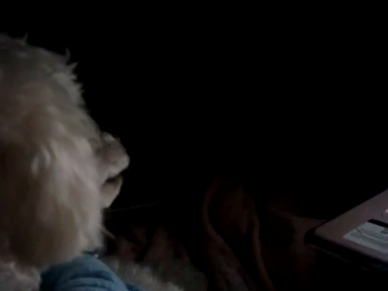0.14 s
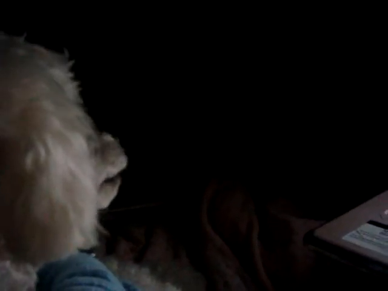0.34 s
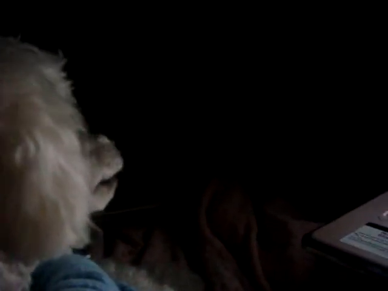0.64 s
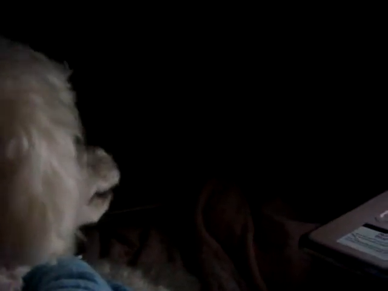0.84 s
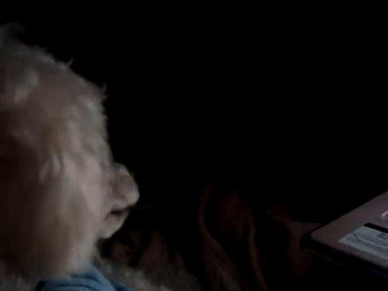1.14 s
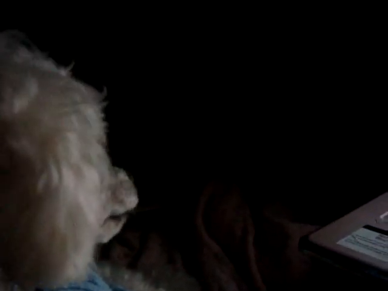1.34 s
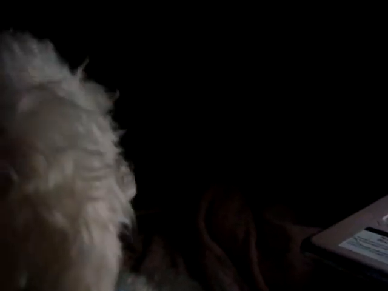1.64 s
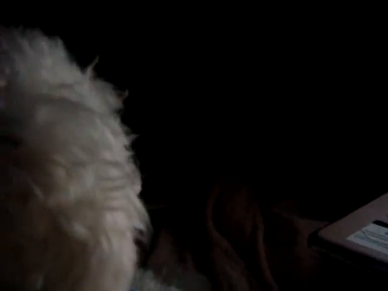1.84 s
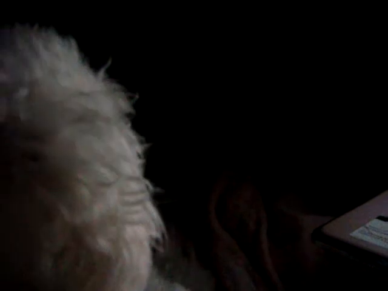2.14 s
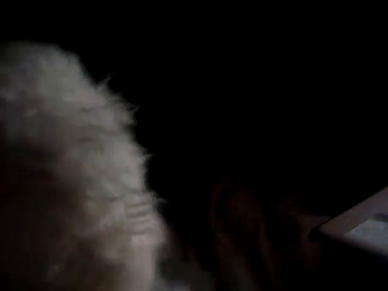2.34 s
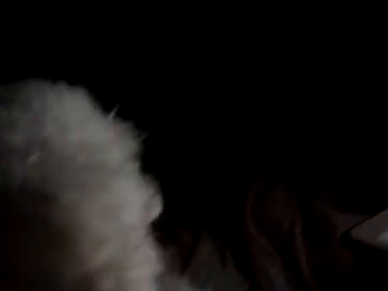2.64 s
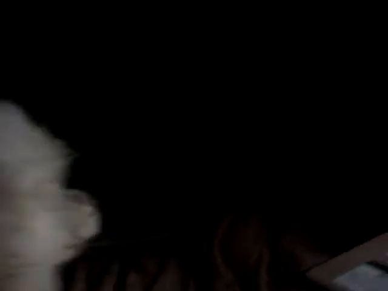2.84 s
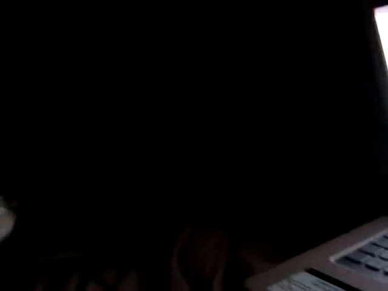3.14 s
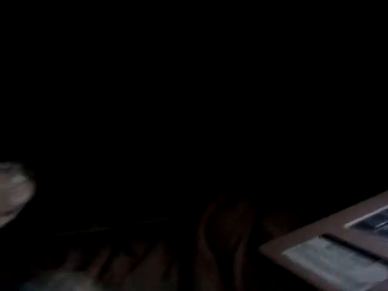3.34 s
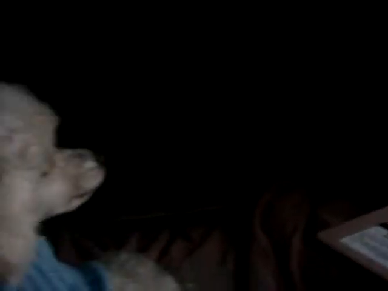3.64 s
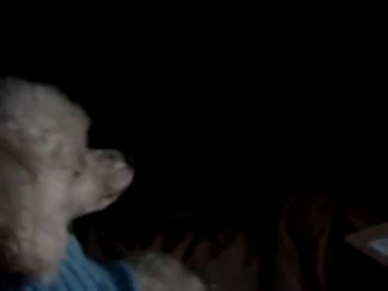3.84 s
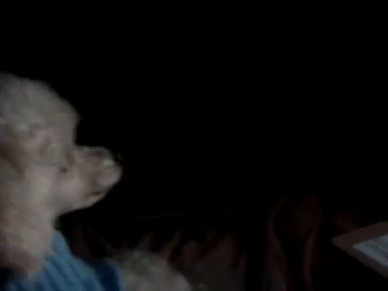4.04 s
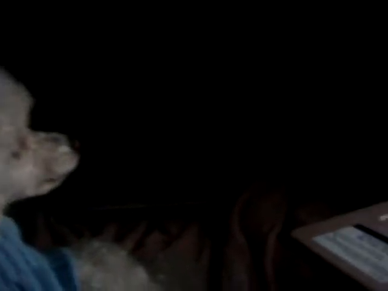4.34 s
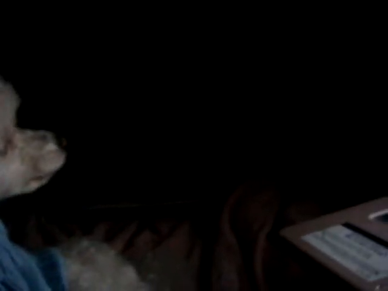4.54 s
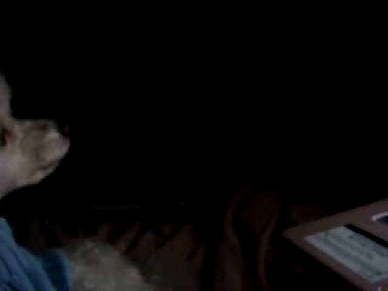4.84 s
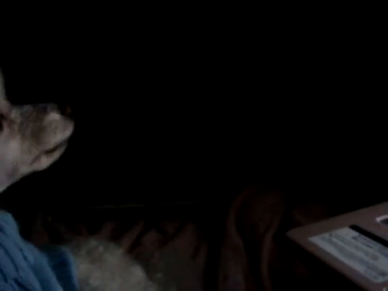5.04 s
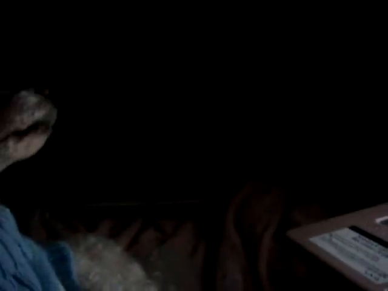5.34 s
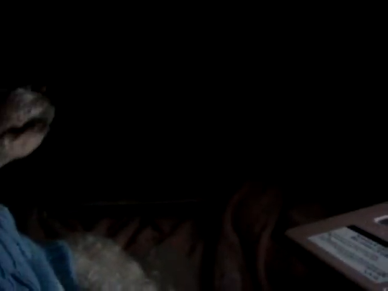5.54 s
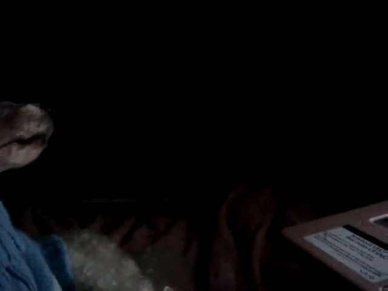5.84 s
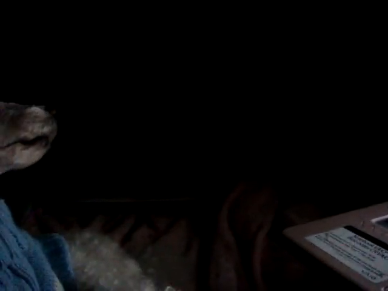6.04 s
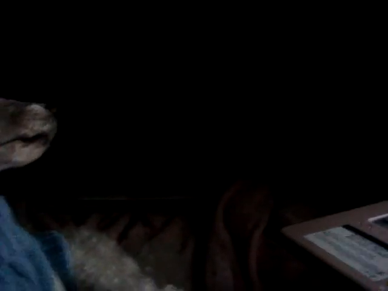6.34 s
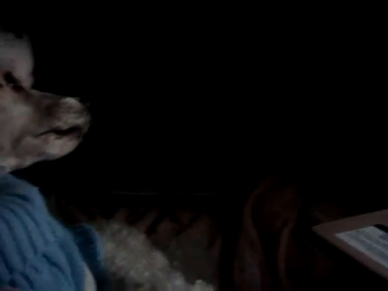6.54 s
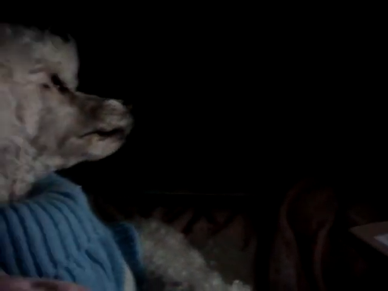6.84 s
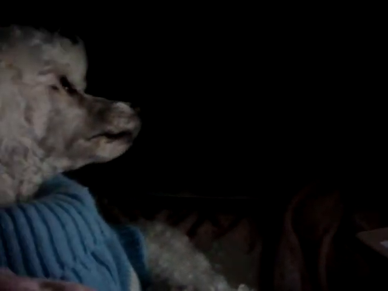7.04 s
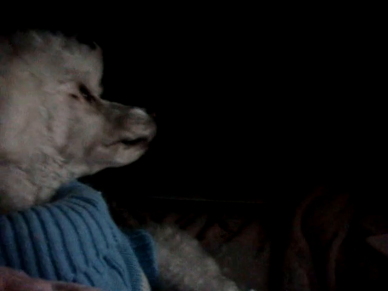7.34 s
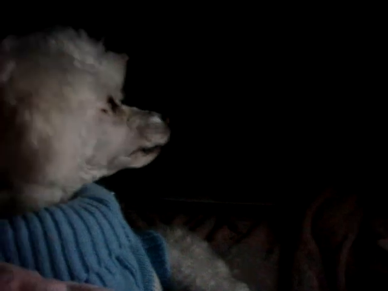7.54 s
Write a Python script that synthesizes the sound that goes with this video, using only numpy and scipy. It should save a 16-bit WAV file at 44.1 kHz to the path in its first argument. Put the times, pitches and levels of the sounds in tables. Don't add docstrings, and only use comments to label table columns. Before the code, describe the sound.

Quiet room, steady faint hiss from a cheap microphone, with dull lows and little top end. At 0.2-0.5 s a barely audible low growl flutters. Around 1.1 s comes a tiny thin peep with a soft grunt; at 1.4 s a short yip with a dry tick, then a faint falling sigh to 1.9. From 2.1 to 2.35 a close whine leaps up and drops; from 2.5 to 3.15 a yelp soars and slides continuously down through a wail into a low sob. A rough, quiet grumble runs 3.35-3.7, with a small dry tick at 3.45. Faint grunts follow near 4. A soft yip at 4.35 leads to sharp high yips at 4.6 (doubled), 4.9 and 5.15, a faint one at 5.6, then loud ones at 5.8 and 6.15, ringing off hard walls. Soft low grunts at 6.4-7.1, a last loud yip at 7.3, then a faint closing moan.

```python
import sys
import numpy as np
from scipy import signal
from scipy.fft import rfft, irfft, next_fast_len
from scipy.io import wavfile
from scipy.ndimage import uniform_filter1d, map_coordinates

SR = 44100
rng = np.random.default_rng(int(sys.argv[2]) if len(sys.argv) > 2 else 0)


def digitize_waveform(pressure):
    field = np.atleast_2d(pressure).T
    bounded = np.clip(field, -1, 1)
    quanta = np.round(bounded * 32767).astype(np.int16)
    wavfile.write(sys.argv[1], SR, quanta)


def linear_from_db(decibels):
    return 10 ** (np.asarray(decibels, float) / 20)


N = 339129

# break_s, length_s, first_hz, last_hz, level_db
YIP_CLIMBS = [
    (1.434, .021, 410, 510, -24),
    (4.595, 0.025, 707, 908, -13.5),
    (4.615, 0.02, 819, 960, -16.5),
    (4.879, .031, 602, 843.8, -14.5),
    (5.146, 0.048, 669, 891, -17.5),
    (5.812, 0.035, 668.5, 867, -12),
    (6.153, .047, 643.4, 883, -11),
    (7.323, 0.024, 782, 826.4, -10.5),
    (4.349, 0.05, 752, 1410, -29.5),
    (5.61, .038, 413.3, 560, -25.5),
]
# length_s, first_hz, top_hz, last_hz, level_db
YIP_FALLS = [(0.057, 680, 810, 870, -11), (.006, 740, 1000, 845, -27), (0.06, 1630, 1580, 890, -22),
             (0.039, 1030, 1065, 910, -17.5), (.06, 1110, 1120, 790, -23.5), (.075, 1100, 1280, 1240, -20),
             (.105, 1265, 1275, 880, -19.5), (0.087, 1260, 1350, 830, -15.5), (.075, 1450, 1470, 1100, -22),
             (0.065, 570, 745, 460, -26)]
# brightness_db_per_octave, room_db, mouth_hz, mouth_db
CLIMB_MOUTHS = [(-0.5, -17, 762.5, 25), (4, -3.5, 2330, 12), (8.5, -2, 2500, 16.5), (2.5, -10, 2110, 16.5),
                (1.5, -10.5, 1420, 7.5), (5, -9, 2200, 8.5), (7, -10, 2720, 9), (0.5, -8.5, 2450, 17.5),
                (-1, -1, 5400, 7.5), (-3, 0, 5500, 8.5)]
# brightness_db_per_octave, room_db, mouth_hz, mouth_db
FALL_MOUTHS = [(6, -9, 2230, 18.4), (1.5, -12.5, 2700, 9), (1, 0, 5320, 12), (1, -1.5, 2100, 16),
               (0, -7.5, 2200, 4.9), (4, 0.5, 2520, 14), (6, -1.5, 2330, 13.495), (5, -2.5, 2520, 18.1),
               (-1.5, -9, 5700, 14), (-5.5, -7.5, 5300, 13)]
# share_of_length_to_come, share_of_climb, level_db
CHEST_SHAPE = [(1, 0.0083, -24), (.75, 0.093, -10.5), (.25, .65, -.1), (0.016, 0.98, -13)]
# share_of_length, share_of_rise, share_of_sag, level_db
HEAD_SHAPE = [(0, 0.18, 0.0082, -12), (0.088, 0.00814, 0.012, -0.76), (.38, .99, 0.0093, -4.5),
              (.62, .99, .3, -13.5), (1, 1, 1, -15)]
EFFORT_BRIGHTENS = 0.31
YIP_DOUBLING = 0.21

# room_db, mouth_hz, mouth_db
WHIMPER_MOUTHS = [
    (-10.5, 3456, 10),
    (-9, 460, -3.5),
    (-9, 2110, 6),
    (-8.5, 1911, 6),
    (-9, 2760, -7.5),
    (-8.5, 1400, 12.5),
]
# time_s, pitch_hz, level_db, brightness_db_per_octave
PEEP = [(1.088, 1086, -39.5, 0), (1.11, 1296, -40.5, -3), (1.126, 1373, -29.5, -12.5),
        (1.142, 1312, -31, -10.5), (1.154, 1272, -41, 3), (1.196, 1294, -33.5, 3), (1.215, 1220, -40.5, 4),
        (1.228, 1105, -35.5, -10)]
SIGH = [(1.545, 1116, -58, -15), (1.583, 782, -34, -12), (1.599, 703, -56, 7), (1.63, 450, -35.5, -6.5),
        (1.65, 375.5, -33, 1.5), (1.694, 335.7, -38.5, -2), (1.759, 289, -33, -2), (1.868, 260.2, -33, -11),
        (1.9, 240, -53.5, 6.5)]
WHINE = [(2.091, 677, -38.5, 2.5), (2.112, 842, -23, -1.5), (2.13, 1151, -25, 2),
         (2.151, 1325, -39.5, -0.5), (2.176, 1174, -29, 3.5), (2.202, 921, -25.5, 4),
         (2.231, 829, -24, -12.5), (2.303, 808, -21.5, -5.5), (2.356, 870, -36, 5.5)]
YELP = [(2.52, 742, -41.5, 5), (2.536, 823, -25.5, -3.5), (2.549, 920, -19.5, -2.5),
        (2.56, 1204, -27, -1.5), (2.577, 1445, -30.5, 1), (2.6, 1470, -25, 3), (2.619, 1403, -33.5, 2),
        (2.643, 1226, -39, 1.5)]
WAIL = [(2.642, 1245, -36.5, 5), (2.672, 1088, -24.5, 0), (2.71, 1001, -25, 4.5), (2.755, 873, -26, 4.5),
        (2.785, 807.6, -18, -5), (2.83, 776, -23, -4), (2.87, 724, -31, 0), (2.905, 660, -28.5, 2.5)]
SOB = [(2.905, 660.6, -25.5, -0.5), (2.936, 635, -27, 3.5), (2.954, 559.7, -21.5, 3),
       (2.97, 523, -24.5, -3), (3.022, 459.7, -23.5, 1), (3.099, 396.2, -26.5, -7.5),
       (3.12, 409, -23, -3.5), (3.165, 386, -42.5, -20)]
# time_s, pitch_hz, level_db, period_doubling (0-1)
GRUMBLE = [(3.345, 280, -37, 0.2), (3.36, 306, -36, 0.5), (3.402, 318.4, -31.5, 0), (3.438, 310, -29.5, 1),
           (3.531, 340.2, -36.5, 0), (3.566, 312.8, -30.5, .9), (3.602, 326, -32, 0.8),
           (3.66, 330.8, -34.5, 1), (3.73, 339.6, -48.5, 0.1)]

# start_s, length_s, first_hz, top_hz, level_db
ARCHES = [(6.646, .11, 298, 354, -34.5), (6.885, 0.1, 408.3, 587, -32.5), (7.127, 0.054, 400, 394, -45),
          (1.473, 0.025, 960, 990, -25), (1.073, 0.035, 460.5, 611, -34), (3.909, 0.056, 313.5, 363, -41.5),
          (3.975, 0.04, 322.2, 320, -50), (4.11, 0.083, 312.3, 415.7, -36),
          (5.368, 0.079, 386, 397.5, -44.5), (5.978, 0.091, 495.5, 497, -45.5),
          (6.41, .12, 296.7, 309.4, -45.5), (7.497, 0.24, 481, 514.6, -43)]
# brightness_db_per_octave, period_doubling (0-1), room_db, mouth_hz, mouth_db
ARCH_MOUTHS = [(-9, 0.4, -5.5, 4550, 16), (-9, 0.31, -5.5, 4550, 14.5), (-9.5, 0.4, -7, 710, 21.5),
               (7.5, 1, -8, 1700, 32.5), (4.5, .55, -8, 1680, 12.5), (-7, .12, -11.5, 1900, 5),
               (-6.5, .05, -3, 998, 8), (0, 0.6, -5, 1440, 4.5), (-5, .45, -9.5, 802, -2),
               (6, 0, -6, 1003, 12), (-5, 0.3, -4.5, 901, -2), (3, 0.14, -2, 997, 3)]
# share_of_length, share_of_climb, level_db
ARCH_SHAPE = [(0, 0.029, -23.5), (.15, .25, 0.5), (.45, .8, -0.7), (.7, .99, 1), (0.998, .8, -17.5)]

# frequency_hz, level_db
OPEN_THROAT = [(150, -74), (400, -36), (650, -6.5), (807, -19), (1000, 4), (1200, -12), (1500, 5.5),
               (1810, -7.5), (2520, -8.5), (2900, -14.5), (3230, -21), (3900, -7), (4810, -10), (6250, -18),
               (6800, -33), (10500, -44.5)]
# frequency_hz, level_db
CLOSED_THROAT = [(150, -86.5), (300, -21), (500, -18.5), (650, 2.5), (807, 10), (1000, 5.5), (1200, -14),
                 (1500, -3), (1900, -4), (2520, -14.5), (3230, -20.5), (3900, -11), (4810, -20.5),
                 (6250, -20), (6800, -39), (10500, -43)]
# frequency_hz, level_db
SPEAKER = [(2950, 1), (3270, -3), (3600, -2), (4300, 0), (4800, 3), (5300, -1), (6300, -5), (6900, -6.5)]
MOUTH_WIDTH = 0.17
TOP_HZ = 10330
OPEN_SMEAR, CLOSED_SMEAR, GRUNT_SMEAR = 0.13, 0.09, 0.13
STRAIN, SMEAR_RISE = 1.45, 1.45

# time_s, level_db
GROWL_LEVEL = [(0.15, -56), (0.162, -65), (0.222, -44), (0.292, -44), (0.378, -42.5), (0.55, -64)]
# time_s, pulses_per_s
GROWL_RATE = [(.2, 95), (.26, 104), (.34, 85.87), (.4, 82), (.5, 116)]
# frequency_hz, level_db
GROWL_COLOUR = [(400, -26.5), (620, -5), (820, 8), (1100, -20.5), (1500, -11.5), (2100, -12), (3000, -34)]

# time_s, peak_db
TICKS = [
    (1.437, -11),
    (3.453, -15),
]
# frequency_hz, level_db
TICK_COLOUR = [(200, -25), (500, -3), (2000, -8), (4200, 0), (6000, -10), (9000, -14)]

# frequency_hz, t60_s
ROOM_DECAY = [(400, 0.499), (1000, 1), (2500, 0.84), (5000, 0.80215), (8000, 0.78)]
# delay_s, level_db
WALLS = [(.013, -12), (.022, -5), (.043, -10)]

# frequency_hz, level_db_per_hz
HISS_COLOUR = [(15, -37.5), (25, -19.5), (119, -11.5), (274, -5.5), (399, -6.5), (431, -6), (568, -8),
               (829, -5), (1270, -9.5), (1440, -5), (2450, -18.5), (3000, -17.5), (9550, -19.5),
               (10300, -23), (13400, -64), (22000, -120)]
HISS_DB = -50


def puppy():
    soft = list(arches())
    calls = [(*call, OPEN_THROAT, OPEN_SMEAR) for call in [*yips(), *soft[:4]]]
    calls += [(*call, CLOSED_THROAT, CLOSED_SMEAR) for call in whimpers()]
    calls += [(*call, CLOSED_THROAT, GRUNT_SMEAR) for call in [grumble(), *soft[4:]]]
    direct, sent = np.zeros(N), np.zeros(N)
    for (room_db, mouth_hz, mouth_db), rows, throat, smear in calls:
        start, call = voice(rows, throat, smear * STRAIN, mouth_hz, mouth_db)
        call = call[:N - start]
        direct[start:start + len(call)] += call
        sent[start:start + len(call)] += call * linear_from_db(room_db)
    return coloured(direct, SPEAKER), coloured(sent, SPEAKER)


def yips():
    for climb, fall, climb_mouth, fall_mouth in zip(YIP_CLIMBS, YIP_FALLS, CLIMB_MOUTHS, FALL_MOUTHS):
        break_s, climb_s, low_hz, high_hz, chest_db = climb
        fall_s, first_hz, top_hz, last_hz, head_db = fall
        chest = [(break_s - share * climb_s, low_hz + rise * (high_hz - low_hz), chest_db, db)
                 for share, rise, db in CHEST_SHAPE]
        head = [(break_s + share * fall_s,
                 first_hz + rise * (top_hz - first_hz) + sag * (last_hz - top_hz), head_db, db)
                for share, rise, sag, db in HEAD_SHAPE]
        for half, (tilt_db, *mouth) in [(chest, climb_mouth), (head, fall_mouth)]:
            yield mouth, [(s, hz, level_db + db, tilt_db + EFFORT_BRIGHTENS * db, YIP_DOUBLING)
                          for s, hz, level_db, db in half]


def whimpers():
    return zip(WHIMPER_MOUTHS, [PEEP, SIGH, WHINE, YELP, WAIL, SOB])


def grumble():
    mouth = (-6, 1255, 9.6)  # room_db, mouth_hz, mouth_db
    tilt_db = -3.5
    return mouth, [(s, hz, db, tilt_db, doubling) for s, hz, db, doubling in GRUMBLE]


def arches():
    for (start_s, length_s, first_hz, top_hz, level_db), settings in zip(ARCHES, ARCH_MOUTHS):
        tilt_db, doubling, *mouth = settings
        yield mouth, [(start_s + share * length_s, first_hz + rise * (top_hz - first_hz),
                       level_db + db, tilt_db, doubling) for share, rise, db in ARCH_SHAPE]


def voice(rows, throat, hoarse, mouth_hz, mouth_db):
    s, *columns = np.array(sorted(rows)).T
    start = round(s[0] * SR)
    t = np.arange(start, round(s[-1] * SR)) / SR
    curves = [uniform_filter1d(np.interp(t, s, column), size=SR // 250) for column in columns]
    hz, level_db, tilt_db, *doubling = curves
    hz = hz * (1 + 0.0066 * wobble(120.02, len(t)))
    phase = 2 * np.pi * np.cumsum(hz) / SR

    order = np.arange(1, 41)[:, None] / (2 if doubling else 1)
    order = order[order[:, 0] * hz.min() < TOP_HZ]
    line_hz = order * hz
    octaves = np.log2(line_hz / 1500)
    mouth = mouth_db * np.exp(-0.5 * (np.log2(line_hz / mouth_hz) / MOUTH_WIDTH) ** 2)
    gain = linear_from_db(along(throat, line_hz) + mouth + tilt_db * octaves) * (line_hz < TOP_HZ)
    smear = np.clip(np.abs(hoarse) * (line_hz / 1500) ** SMEAR_RISE, 0, 0.95)
    if doubling:
        gain[::2] *= np.clip(doubling[0], 0, 1)
        loose = np.clip((-31 - level_db) / 22, 0, 0.6)
        smear = np.clip(smear + loose, 0, 0.95)

    drift = linear_from_db(3 * haze(gain.shape, 35).real)
    lines = drift * np.sqrt(1 - smear ** 2) + smear * haze(gain.shape, 450)
    spin = np.exp(1j * (order * phase + 0.4 * order ** 2))
    tone = (gain * lines * spin).imag.sum(0)
    tone /= np.sqrt((gain ** 2).sum(0) / 2)
    edge = np.clip(np.minimum(t - t[0], t[-1] - t) / 0.0015, 0, 1)
    return start, linear_from_db(level_db) * edge * tone


def growl():
    t = np.arange(N) / SR
    s, db = np.transpose(GROWL_LEVEL)
    rate = np.interp(t, *np.transpose(GROWL_RATE)) * (1 + 0.04 * wobble(50, N))
    pulses = np.diff(np.floor(np.cumsum(rate) / SR), prepend=0)
    pulses = pulses * linear_from_db(2.5 * wobble(60, N))
    source = unit(pulses) + 0.45 * rng.standard_normal(N)
    return linear_from_db(np.interp(t, s, db, -120, -120)) * unit(coloured(source, GROWL_COLOUR))


def ticks():
    out = np.zeros(N)
    t = np.arange(SR // 20) / SR
    for s, peak_db in TICKS:
        crack = linear_from_db(peak_db - 60 * t / 0.01) * rng.standard_normal(len(t))
        out[round(s * SR):][:len(t)] += crack
    return coloured(out, TICK_COLOUR)


def room(x):
    hz, t, z = signal.stft(rng.standard_normal(SR), SR, nperseg=256)
    decay = linear_from_db(-60 * t / along(ROOM_DECAY, hz)[:, None])
    tail = signal.istft(z * decay, SR, nperseg=256)[1]
    fade_in = np.clip(np.arange(len(tail)) / SR / 0.0037, 0, 1)
    tail *= fade_in / np.linalg.norm(tail)
    for s, db in WALLS:
        tail[round(s * SR)] += linear_from_db(db)
    return signal.fftconvolve(x, tail)[:N]


def hiss():
    noise = unit(coloured(rng.standard_normal(N), HISS_COLOUR))
    return linear_from_db(HISS_DB + 0.53 * wobble(7.4, N)) * noise


def unit(x):
    return x / np.sqrt(np.mean(np.abs(x) ** 2) + 1e-20)


def along(points, hz):
    f, v = np.transpose(points)
    return np.interp(np.log(hz + 1), np.log(f + 1), v)


def coloured(x, points):
    size = next_fast_len(len(x) + 8192)
    gain = linear_from_db(along(points, np.fft.rfftfreq(size, 1 / SR)))
    return irfft(rfft(x, size) * gain, size)[:len(x)]


def wobble(rate, size):
    knots = rng.standard_normal(int(size * rate / SR) + 4)
    return map_coordinates(knots, [np.arange(size) * rate / SR])


def haze(shape, width_hz):
    z = rng.standard_normal((2, *shape))
    for _ in range(2):
        z = uniform_filter1d(z, size=round(SR / width_hz))
    return unit(z[0] + 1j * z[1])


def scene():
    direct, sent = puppy()
    return (direct + room(sent) + growl() + ticks() + hiss())[None]


def top_cut(x):
    return signal.sosfilt(signal.butter(12, 10810, fs=SR, output="sos"), x)


def record(dry):
    mix = coloured(dry[0], [(TOP_HZ - 150, 0), (TOP_HZ, -80)])[None]
    return top_cut(mix)


dry = scene()
out = record(dry)
digitize_waveform(out)
```